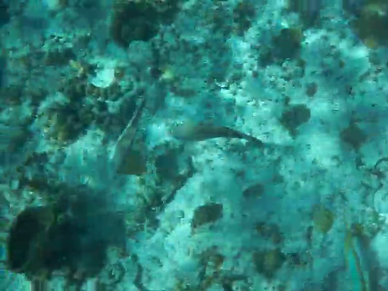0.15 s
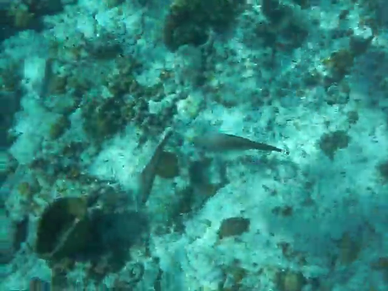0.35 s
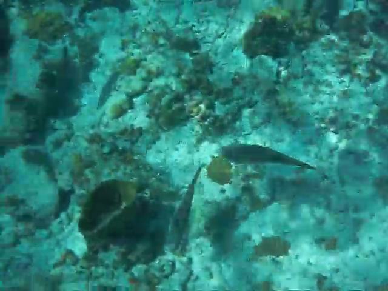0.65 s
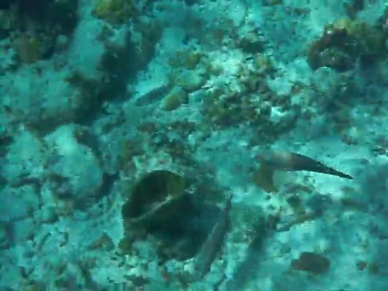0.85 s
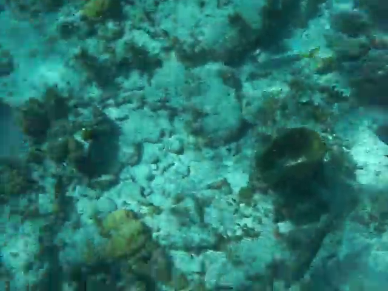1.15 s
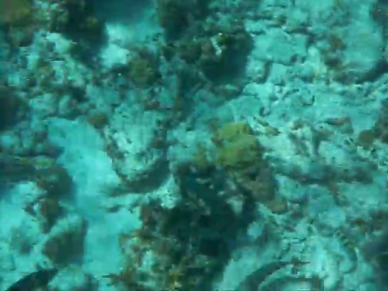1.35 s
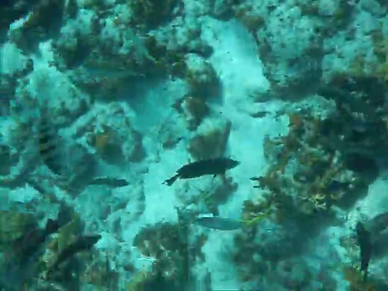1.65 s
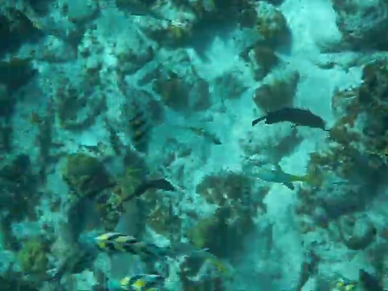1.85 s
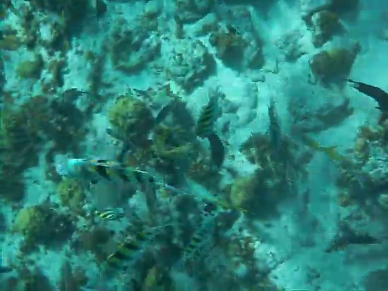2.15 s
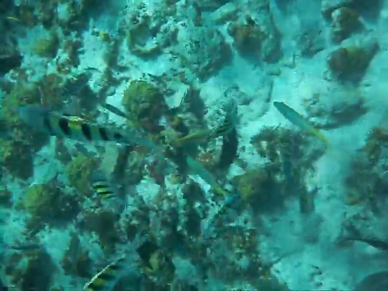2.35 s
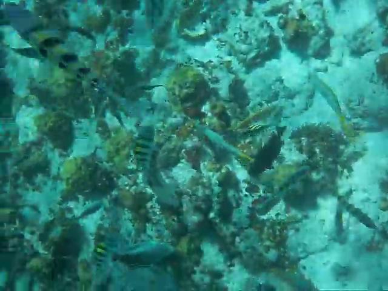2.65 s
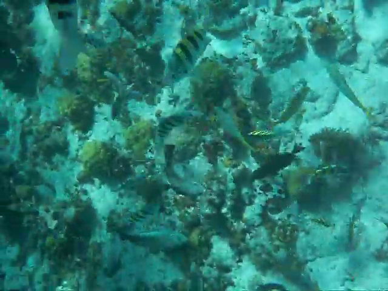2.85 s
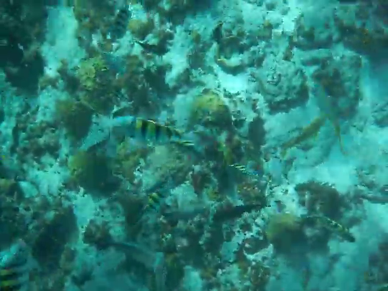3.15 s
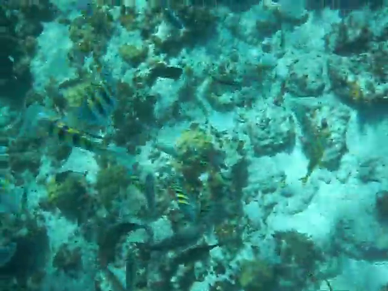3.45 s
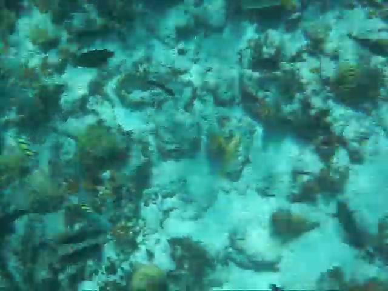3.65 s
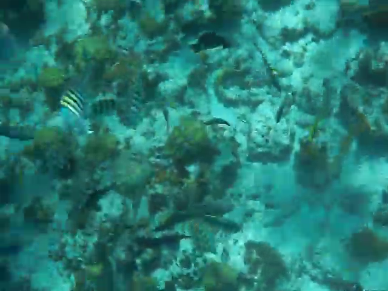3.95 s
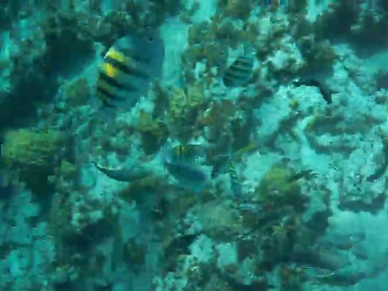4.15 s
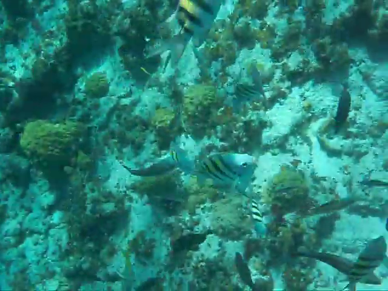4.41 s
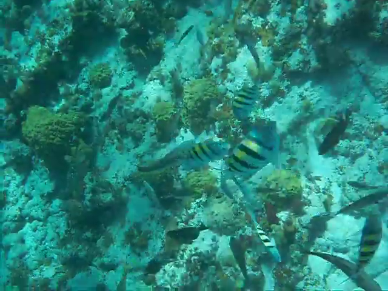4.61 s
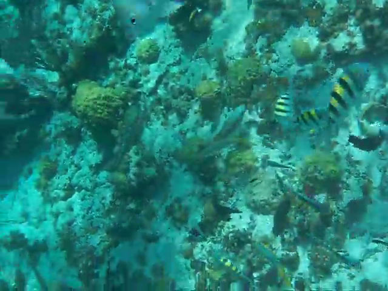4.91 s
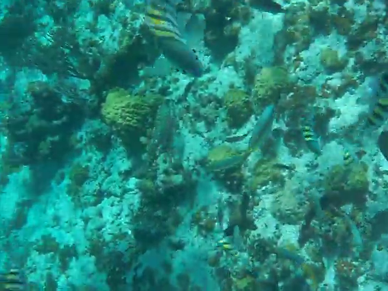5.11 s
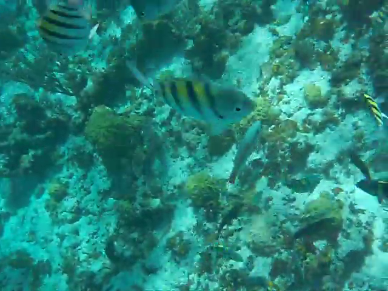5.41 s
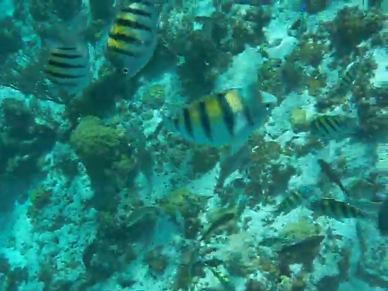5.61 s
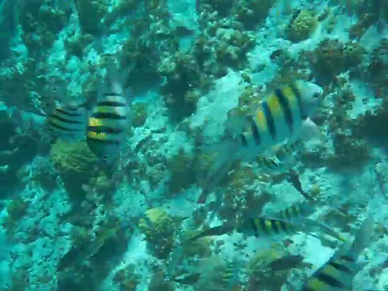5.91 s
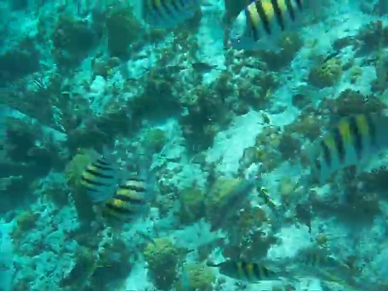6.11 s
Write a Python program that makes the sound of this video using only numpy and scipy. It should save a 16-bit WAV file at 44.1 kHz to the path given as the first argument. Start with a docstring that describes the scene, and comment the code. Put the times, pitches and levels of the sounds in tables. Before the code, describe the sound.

A muffled, buzzing motor drone heard beneath the surface, with tiny crackling ticks, a sudden splashy thump and knocks, then slow fading.

```python
"""Boat engine over a reef

Heard under water: three uneven firings a turn excite resonances of the hull, which hums, whines and clatters.
Shrimp and hard engine taps tick as brief bursts, turbulent water sloshes round the housing, and air pockets,
two deep thumps and the body of a knock sound as short decaying low tones.
Hard knocks on the housing overload the input, whose peaks clip."""
import sys
import numpy as np
from scipy import signal
from scipy.fft import rfft, irfft, next_fast_len
from scipy.io import wavfile
from scipy.ndimage import uniform_filter1d, map_coordinates

SR = 44100
rng = np.random.default_rng(int(sys.argv[2]) if len(sys.argv) > 2 else 0)


def convert_level_to_amplitude(level_db):
    """Map a level in decibels to its linear amplitude factor."""
    exponent = np.asarray(level_db, float) / 20
    return 10 ** exponent


def generate_wav(signal):
    """Clip the signal to [-1, 1] and save it as 16-bit WAV at the path in sys.argv[1]."""
    frames = np.transpose(np.atleast_2d(signal))
    scaled = np.clip(frames, -1, 1) * 32767
    pcm = np.round(scaled).astype(np.int16)
    wavfile.write(sys.argv[1], SR, pcm)


N = 276507  # samples

# far drone spectrum: frequency_hz, gain_db
DRONE_COLOUR = [(12, -22.5), (25, 3.5), (50, -4.5), (85, -10), (120, -7.5), (160, -1), (210, -4.5),
                (300, -6), (340, -10.5), (370, 0), (430, -1), (500, -13), (560, -40), (900, -120)]
# drone mean level; the hull part above the split follows the engine level, the water part below does not
DRONE_DB, DRONE_FOLLOWS, DRONE_SPLIT_HZ = -29, 1.7, 260

# loud ticks of shrimp or hard engine taps, and a short rattle near 0.5 s: start_s, level_db, pitch_hz
TICKS = [(0.3286, -24, 3120), (0.482, -25.5, 4660), (0.4937, -12.5, 4010), (0.5013, -18, 3310),
         (0.5187, -20, 2830), (0.5324, -20, 3030), (0.5408, -30, 2640), (0.5504, -30, 4450),
         (0.5574, -25, 2500), (0.596, -22, 3430), (0.6159, -27, 2870), (0.635, -15.5, 2710),
         (0.6518, -22, 2720), (0.824, -16.5, 3220), (0.99, -18, 2760), (1.051, -20, 3130),
         (1.0904, -18, 2890), (1.355, -20, 3030), (2.2022, -14, 3240), (2.278, -18.5, 4310),
         (2.636, -12.5, 3390), (2.6662, -16, 3240), (3.01, -16, 2610), (3.3317, -19, 3010),
         (3.371, -14, 3010), (3.483, -16, 3010), (3.9812, -14, 2540), (5.2192, -12.5, 3940),
         (5.3776, -20, 4200), (6.166, -30, 3130)]

# turbulence spectrum: frequency_hz, gain_db
SLOSH_COLOUR = [(15, -15), (40, 3), (150, 1.5), (300, 1.5), (450, -2.5), (800, -10.5), (2500, -34),
                (5000, -54), (7000, -120)]
# surges of water round the housing: start_s, level_db, t60_s
SURGES = [(3.009, -26.5, 0.13), (3.069, -13.5, .3), (3.255, -13.5, .4), (3.32, -17, 0.22),
          (3.444, -14.5, 0.45), (3.521, -20, 0.57), (3.612, 12.5, 0.29), (3.68, 2, 0.23),
          (3.725, -1.5, .12), (3.821, 0, 0.12), (3.77, -14, .8), (3.901, -21.5, 0.13), (3.98, -15, 0.22),
          (4.03, -10.5, .15), (4.054, -4, 0.29), (4.1, -8, .2), (4.15, -11, 0.25), (4.26, -25.5, 0.51)]
SURGE_RISE_S = .012
# slow swing of the microphone membrane
SWING_AT_S, SWING_HZ, SWING_DB, SWING_T60_S = 3.758, 6.2, -8, 1.5

# short decaying low tones: air pockets, two deep thumps near 1.3 s, a knock's body at 3.826 s:
# start_s, pitch_hz, level_db, life_s
LOW_TONES = [(1.242, 54.9, -20, 0.14), (1.339, 59.5, -16.5, 0.025), (2.859, 196.6, -31, 0.064),
             (3.013, 323, -13, 0.023), (3.07, 282, -7.5, 0.02), (3.131, 337.4, 3.5, 0.043),
             (3.288, 321, -14, 0.073), (3.325, 226, -14.5, .03), (3.413, 412.5, -8, 0.057),
             (3.518, 263.4, -21, 0.048), (3.826, 424, -4, 0.025), (3.9, 258, -11, 0.013),
             (3.984, 144, -7, 0.019), (4.069, 299.5, -7, 0.037), (4.095, 186.7, -6.5, 0.044),
             (4.169, 211, -6.5, 0.024), (5.861, 164, -12.5, 0.041), (6.025, 860, -5.5, 0.029)]

# hard knocks on the housing, before colouring: start_s, level_db, t60_s
KNOCKS = [(2.177, 2, 0.019), (3.632, 8, 0.035), (3.645, 6, 0.029), (3.675, 3, 0.038), (3.685, -2, 0.037),
          (3.762, 3.5, 0.011), (3.788, -12, 0.013), (3.823, 6.5, .035)]

# engine speed: time_s, turns_per_s
SPEED = [(0, 52.62), (3, 52.62), (3.3, 52.5), (4.1, 52.5), (4.4, 52.62), (6.27, 52.62)]
FIRST_TURN = .68  # turns
# the three cylinders: place_turns, low_hum_db, high_hum_db, clatter_db
CYLINDERS = [(-.04, -9, 0, 0), (.18, -1, -8, -7), (.64, 0, -9, -13)]
# hull sound arriving: time_s, level_db, brightness_db
ENGINE = [(0, -11, -11.5), (.5, -13, -4.5), (1.2, -13.5, -1), (2, -14.5, 1), (2.7, -13.5, -0.5),
          (3.5, -15.5, 1), (4.5, -16.5, 0.5), (5.5, -17.5, 2), (6.27, -19, 4)]
# lower and higher resonances of the hull plates: centre_hz, width_hz, gain_db
LOW_PLATES = [(740, 680, -4), (551.7, 13, -7), (560, 5.3, -5.5), (629, 8.4, 1.5), (700.5, 58, 3.5),
              (746.7, 10, 1.5), (847.7, 53, -6.5)]
HIGH_PLATES = [(1066, 164, 2.5), (1218, 200, -5.5), (951, 29, -4), (970, 7.4, 1), (1052, 71, -6),
               (1263, 180, -2), (1281, 20, 8.5)]
# gear whines: multiple_of_engine_speed, level_db
GEARS = [(7, -32), (11.12, -26.5), (11.99, -27.5), (14.08, -20.5), (16.05, -27), (19.26, -22),
         (20.25, -26.5), (25.47, -25.5)]
# valve gear noise spectrum: frequency_hz, gain_db
CLATTER_COLOUR = [(1100, -38.5), (1450, 5), (1600, -9), (1800, -2), (1920, -7), (2040, -7), (2180, -11.5),
                  (2330, -10.5), (2600, -18), (3150, -19), (3500, -22.5), (5200, -26), (5900, -50),
                  (8000, -120)]
# valve cover modes, at the three times in cover(): pitch_hz, early_db, middle_db, late_db over the clatter
COVER = [(1700, -22, -16, -11), (1800, -12, -6, -11), (2040, -16, -8, -18), (2320, -16, -14, -13),
         (3020, -28, -26, -22), (3250, -28, -26, -21)]
# layers against the low hum: offset in dB, and dB gained per dB of brightness
HIGH_DB, HIGH_BRIGHTENS = -0.5, 1
CLATTER_DB, CLATTER_BRIGHTENS = -13, 0.91

TOP_HZ = 5500  # top of the input band
CEILING = .705  # amplitude at which the input clips


def unit(x):
    """Normalisation: scale a signal to rms 1."""
    return x / np.sqrt(np.mean(x ** 2) + 1e-20)


def curves(rows):
    """Linear interpolation: one value per sample for each column after the time."""
    s, *cols = np.transpose(rows)
    return [np.interp(np.arange(N) / SR, s, c) for c in cols]


def wobble(rate):
    """Slow random modulation: a smooth curve through random knots, rate of them a second."""
    knots = rng.standard_normal(int(N * rate / SR) + 4)
    return map_coordinates(knots, [np.arange(N) * rate / SR])


def filtered(x, response):
    """Linear filtering: the spectrum of x times a response of frequency."""
    m = next_fast_len(N + SR // 2)
    return irfft(rfft(x, m) * response(np.fft.rfftfreq(m, 1 / SR)), m)[:N]


def colour(points):
    """Spectral shaping: gain through (Hz, dB) points on a logarithmic frequency axis."""
    f, db = np.transpose(points)
    return lambda hz: convert_level_to_amplitude(np.interp(np.log(hz + 1), np.log(f + 1), db))


def add(track, s, sound):
    """Superposition: mix a short sound in at time s."""
    part = track[round(s * SR):][:len(sound)]
    part += sound[:len(part)]


def drone(low_db):
    """Broadband low noise: only the part above the split, carried by the hull, follows the engine level."""
    whole = unit(filtered(rng.standard_normal(N), colour(DRONE_COLOUR)))
    water = filtered(whole, lambda hz: 1 / (1 + (hz / DRONE_SPLIT_HZ) ** 4))
    hull = convert_level_to_amplitude(DRONE_FOLLOWS * (low_db - low_db.mean())) * (whole - water)
    return convert_level_to_amplitude(DRONE_DB + 0.26 * wobble(6.5)) * (water + hull)


def ticks(per_second=70, far_db=-38, spread_db=-0.5):
    """Impulsive sources: decaying bursts, as loud ticks of shrimp or engine, a rattle and a faint crackle."""
    track, t = np.zeros(N), np.arange(SR // 100) / SR
    draw = rng.random((int(per_second * N / SR), 3))
    start_s = draw[:, 0] * N / SR
    level_db = far_db - spread_db * np.log(draw[:, 1] + 0.0084)
    pitch_hz = 2600 + 2800 * draw[:, 2]
    for s, db, hz in [*TICKS, *np.transpose([start_s, level_db, pitch_hz])]:
        burst = np.sin(2 * np.pi * hz * t) + 1.7 * rng.standard_normal(len(t))
        add(track, s, convert_level_to_amplitude(db) * burst * convert_level_to_amplitude(-60 * t / 0.0096))
    return filtered(track, lambda hz: hz ** 2 / (hz ** 2 + 2200 ** 2))


def slosh():
    """Turbulent flow noise: lumpy low noise in surges on the housing, and the damped swing of its membrane."""
    turbulence = filtered(rng.standard_normal(N), colour(SLOSH_COLOUR))
    rush = unit(convert_level_to_amplitude(3.5 * wobble(45)) * turbulence)
    flow, swing, t = np.zeros(N), np.zeros(N), np.arange(SR // 2) / SR
    for s, db, t60 in SURGES:
        add(flow, s, convert_level_to_amplitude(db - 60 * t / t60) * np.minimum(t / SURGE_RISE_S, 1) ** 2)
    add(swing, SWING_AT_S, -convert_level_to_amplitude(SWING_DB - 60 * t / SWING_T60_S) * np.sin(2 * np.pi * SWING_HZ * t))
    return flow * rush + swing


def low_tones():
    """Damped oscillation: air pockets, deep thumps and a knock's body decay, rising a little in pitch."""
    track = np.zeros(N)
    for s, hz, db, life in LOW_TONES:
        age = np.arange(int(2 * life * SR)) / SR / life  # in lives
        shape = 8.0 * age * np.exp(1 - 7.5 * age)
        cycles = hz * life * age * (.98 + 0.05 * age)
        add(track, s, convert_level_to_amplitude(db) * shape * np.sin(2 * np.pi * cycles))
    return track


def knocks():
    """Contact noise: short wide-band bursts from hard contact with the housing."""
    track, t = np.zeros(N), np.arange(SR // 20) / SR
    for s, db, t60 in KNOCKS:
        add(track, s, convert_level_to_amplitude(db - 60 * t / t60) * rng.standard_normal(len(t)))
    return filtered(track, colour([(100, -13.5), (700, 16), (2000, 4.5), (5000, -6), (8000, -45)]))


def firing(turns, column, life_s, scatter_db, steady):
    """Periodic excitation: pressure jumps at each firing, each of its own strength, and dies away."""
    envelope = np.full(N, steady)
    for cylinder in CYLINDERS:
        place = turns - cylinder[0] + 1
        age_s = (place % 1) / SPEED[0][1]
        scatter = scatter_db * rng.standard_normal(int(place[-1]) + 1)
        strength_db = cylinder[column] + scatter[place.astype(int)]
        rise = 1 - np.exp(-age_s / .0004)
        envelope += convert_level_to_amplitude(strength_db) * np.exp(-age_s / life_s) * rise
    return envelope


def plates(modes):
    """Modal superposition: a causal sum of resonances, all driven alike."""
    return lambda f: sum(convert_level_to_amplitude(db) * 1j * f * w / (c * c - f * f + 1j * f * w) for c, w, db in modes)


def hull_ring(turns, column, modes, steady, push, damping):
    """Forced resonance: noisy bursts on a repeating push ring plates, whose sound falls between firings."""
    load = firing(turns, column, life_s=.003, scatter_db=1.5, steady=steady)
    blows = load * rng.standard_normal(N) + push * np.gradient(load)

    def response(hz):
        """Band limitation: the modes, made dark below and above the plates."""
        low_cut = (hz / 500) ** 8 / (1 + (hz / 500) ** 8)
        return plates(modes)(hz) * low_cut / (1 + (hz / 1400) ** 8)

    return unit(unit(load) ** damping * filtered(blows, response)), load


def gear_whine(turns, load):
    """Tooth meshing: tones at multiples of the engine speed, pulsing with the firings."""
    teeth = sum(convert_level_to_amplitude(db + 0.71 * wobble(4.4)) * np.sin(2 * np.pi * k * turns + 0.56 * wobble(9))
                for k, db in GEARS)
    return unit(load + 2.7) * teeth


def cover(taps):
    """Modal ringing: each valve tap rings the cover's modes, whose phase drifts from tap to tap."""
    t = np.arange(N) / SR
    ring = np.zeros(N)
    for hz, *db in COVER:
        level = convert_level_to_amplitude(np.interp(t, [.5, 2.2, 4.2], db))
        ring += level * np.sin(2 * np.pi * hz * t + 1.3 * wobble(45))
    return unit(uniform_filter1d(taps, size=60) ** 2) * ring


def valve_clatter(turns):
    """Impact noise: valve taps gate coloured noise and ring the valve cover."""
    taps = firing(turns, column=3, life_s=.004, scatter_db=1.8, steady=.22)
    noise = unit(filtered(taps * rng.standard_normal(N), colour(CLATTER_COLOUR)))
    return noise + cover(taps)


def engine(low_db, bright_db):
    """Structure-borne sound: firings ring the hull plates and pulse the whine; valve gear clatters above."""
    high_db = low_db + HIGH_DB + HIGH_BRIGHTENS * bright_db
    clatter_db = low_db + CLATTER_DB + CLATTER_BRIGHTENS * bright_db
    turns = FIRST_TURN + np.cumsum(curves(SPEED)[0]) / SR
    low, _ = hull_ring(turns, column=1, modes=LOW_PLATES, steady=0.19, push=1.7, damping=0.25)
    high, load = hull_ring(turns, column=2, modes=HIGH_PLATES, steady=.16, push=7.0, damping=0.23)
    hull = convert_level_to_amplitude(low_db) * low + convert_level_to_amplitude(high_db) * high
    whine = convert_level_to_amplitude(low_db + 13) * gear_whine(turns, load)
    return hull + whine + convert_level_to_amplitude(clatter_db) * valve_clatter(turns)


def scene():
    """Superposition: the pressures of all sources add at one microphone."""
    low_db, bright_db = curves(ENGINE)
    background = drone(low_db) + ticks() + slosh() + low_tones() + knocks()
    return (background + engine(low_db, bright_db))[None]


def squeezed(x, knee=0.71, most_db=-1.5):
    """Gain compression: a fast limiter eases loud bursts, by 1.5 dB at most."""
    level = np.sqrt(2 * np.abs(uniform_filter1d(x ** 2, size=90)))
    return x * np.maximum((1 + (level / knee) ** 4) ** -.2, convert_level_to_amplitude(most_db))


def band_limit(x):
    """A steep low-pass at the top of the band."""
    return signal.sosfilt(signal.butter(12, 15900, fs=SR, output="sos"), x)


def record(dry):
    """Sampling and clipping: a slow converter clips; smoothing to the full rate overshoots and clips again.

    The tips clipped the second time are heard as thin treble ticks."""
    def band(hz):
        """Low-pass filtering: steep attenuation above the input band."""
        return 1 / (1 + (hz / TOP_HZ) ** 24)

    offset = -.0044
    level = squeezed(filtered(dry[0], band)) + offset
    kept = np.arange(N) % 4 == 0  # a quarter of the full rate
    samples = 4 * kept * np.clip(level, -CEILING, CEILING)
    smooth = filtered(samples, band)
    return band_limit(np.clip(smooth, -CEILING, CEILING)[None])


dry = scene()
out = record(dry)
generate_wav(out)
```